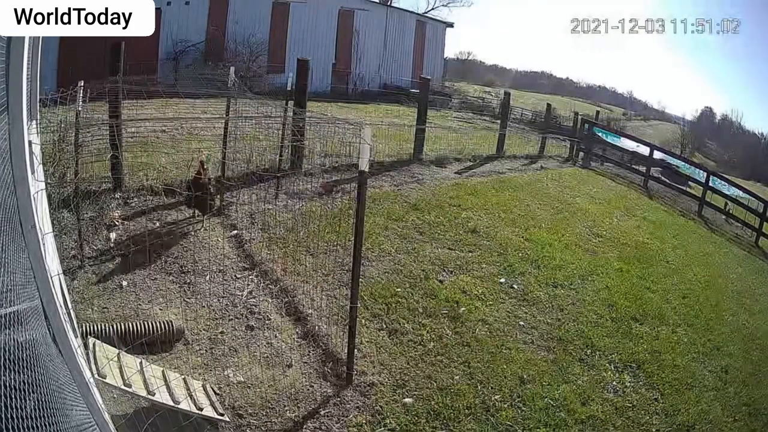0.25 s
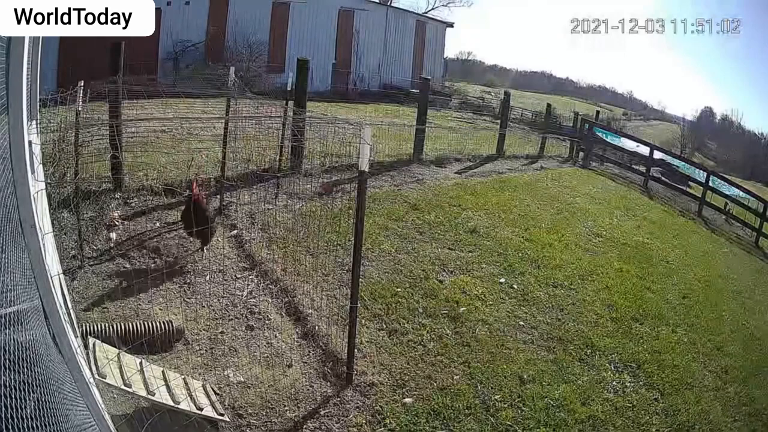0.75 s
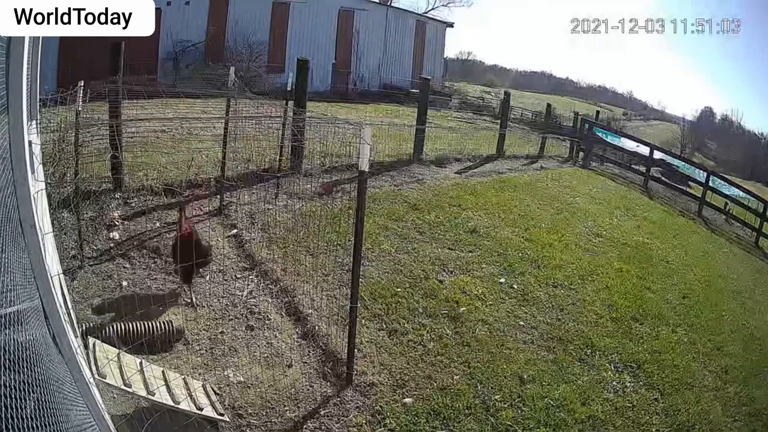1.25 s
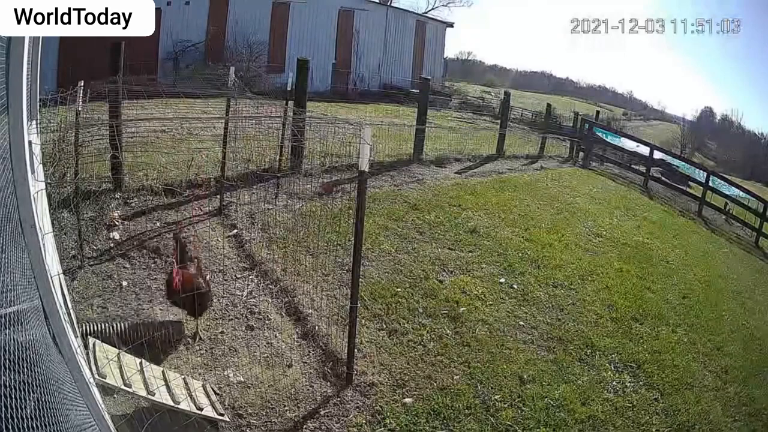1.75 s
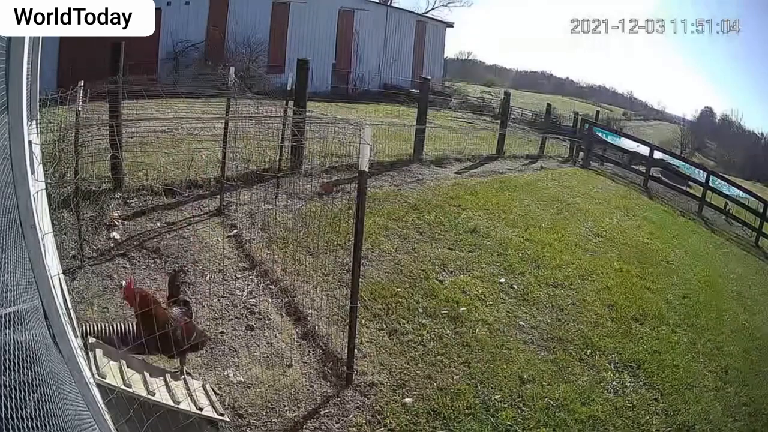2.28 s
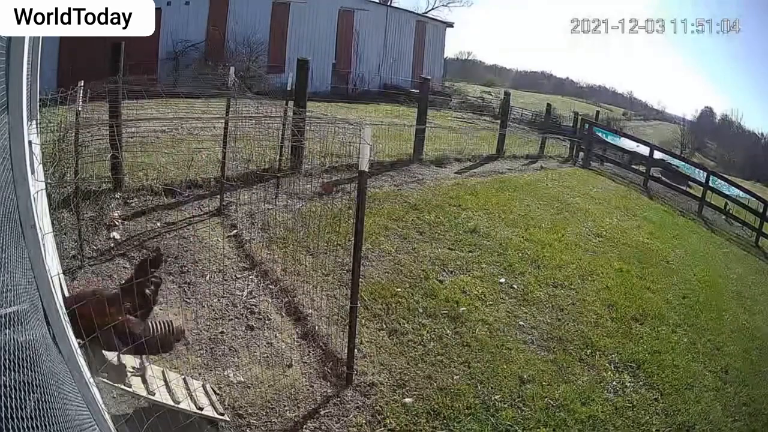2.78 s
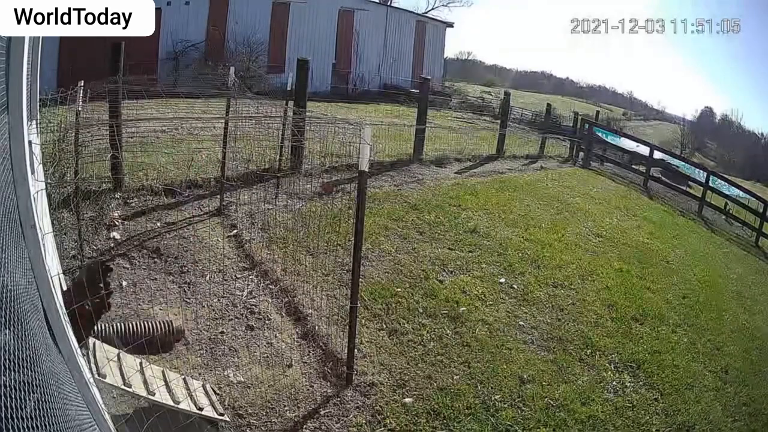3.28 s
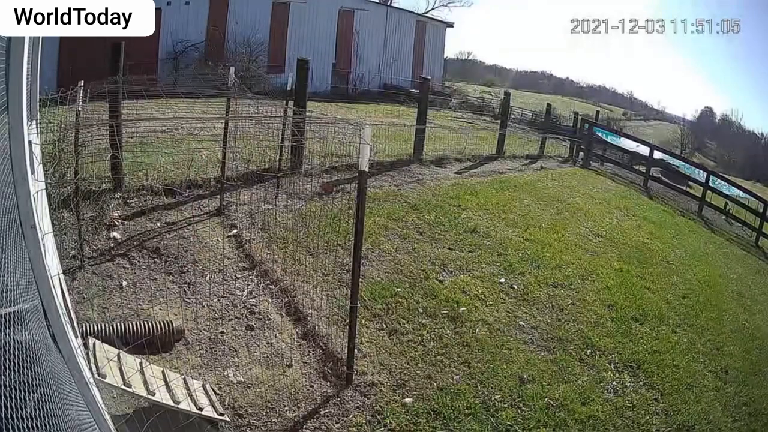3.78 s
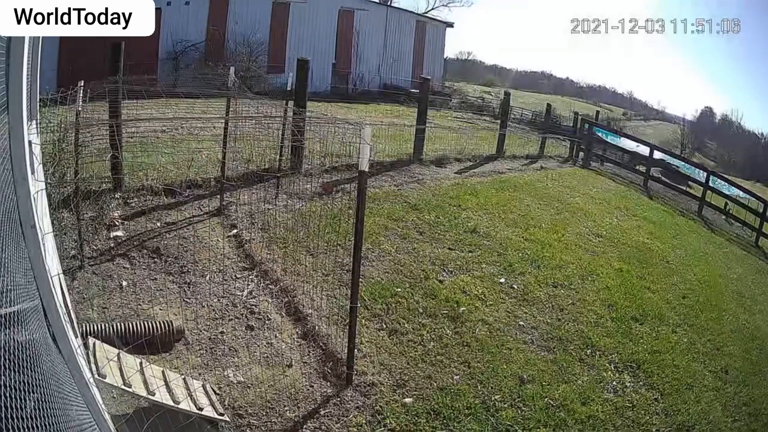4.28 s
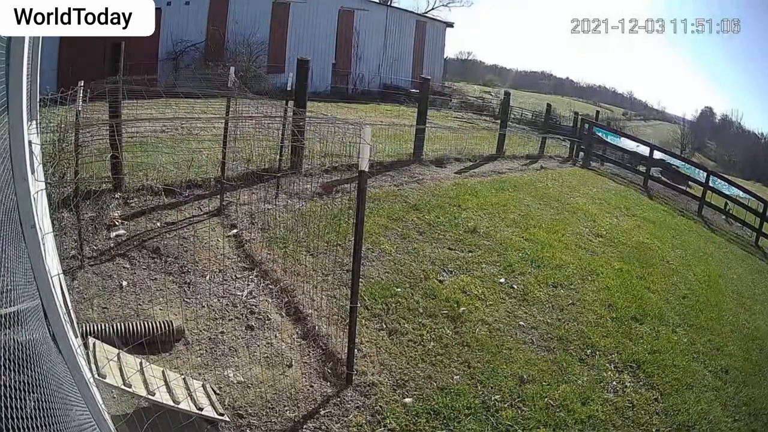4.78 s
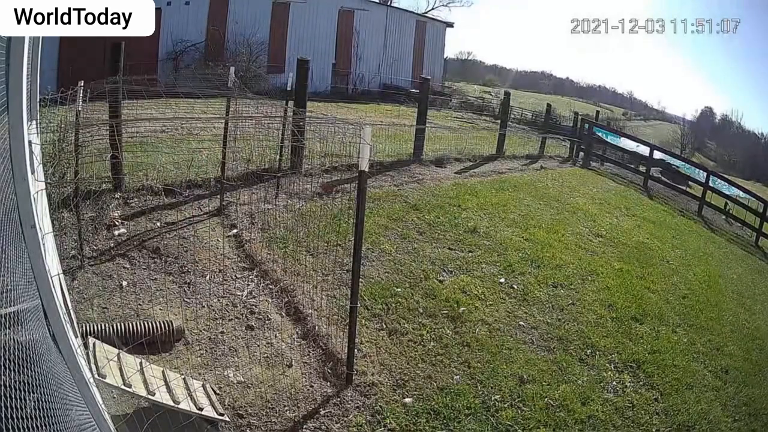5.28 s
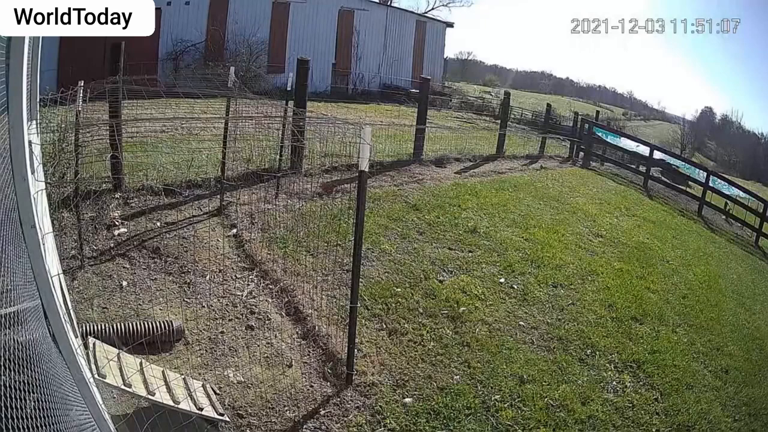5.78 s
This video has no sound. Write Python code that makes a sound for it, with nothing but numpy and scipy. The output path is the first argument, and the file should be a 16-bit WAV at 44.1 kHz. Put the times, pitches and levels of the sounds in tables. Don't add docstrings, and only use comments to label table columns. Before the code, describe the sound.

Hoarse, sharp chicken cackles in an open yard with faint echoes, a few claw ticks and soft wooden thumps, distant machinery humming quietly underneath.

```python
import sys
import numpy as np
from scipy import signal
from scipy.fft import rfft, irfft, next_fast_len
from scipy.io import wavfile
from scipy.ndimage import uniform_filter1d, minimum_filter1d, map_coordinates

SR = 44100
rng = np.random.default_rng(int(sys.argv[2]) if len(sys.argv) > 2 else 0)


def decibels_to_gain(level_db):
    exponent = np.asarray(level_db, float) / 20
    return 10 ** exponent


def file_out(sig):
    cols = np.atleast_2d(sig).T
    lim = np.clip(cols, -1, 1)
    pcm = np.round(lim * 32767).astype(np.int16)
    wavfile.write(sys.argv[1], SR, pcm)


N = 266795
T = np.arange(N) / SR


def unit(x):
    return x / np.sqrt(np.mean(x ** 2) + 1e-20)


def along(points, hz):
    f, v = np.transpose(points)
    return np.interp(np.log(hz + 1), np.log(f + 1), v)


def filtered(x, response):
    m = next_fast_len(len(x) + 8192)
    return irfft(rfft(x, m) * response(np.fft.rfftfreq(m, 1 / SR)), m)[:len(x)]


def coloured(x, spectrum):
    points = [(0.84, -120)] + list(spectrum) + [(9000, -120)]
    return unit(filtered(x, lambda hz: decibels_to_gain(along(points, hz))))


def wobble(n, rate):
    knots = rng.standard_normal(int(n * rate / SR) + 4)
    return map_coordinates(knots, [np.arange(n) * rate / SR])


def scattered(x, t60):
    t = np.arange(SR // 16) / SR
    reply = rng.standard_normal(len(t)) * decibels_to_gain(-60 * t / t60)
    return signal.fftconvolve(x, reply)[:len(x)]


def syrinx(pitch_hz, jitter, shimmer_db, breath):
    n = len(pitch_hz)
    phase = 2 * np.pi * np.cumsum(pitch_hz * (1 + jitter * wobble(n, 160))) / SR
    k = np.arange(1, 24)[:, None]
    pulses = unit(np.cos(k * phase).sum(axis=0)) * decibels_to_gain(shimmer_db * wobble(n, 219.6))
    air = unit((1 + 1.4 * np.cos(phase)) * rng.standard_normal(n))
    return np.sqrt(1 - breath) * unit(pulses) + np.sqrt(breath) * air


# t/s, hold/s, low voice level/dB, its second harmonic f/Hz, high voice over it level/dB
CLUCK_EVENTS = [(0.327, .022, -16, 735, -14), (0.559, .032, -16.5, 780, -4.5),
                (0.803, .021, -15, 717, -12.5), (1.415, .026, -18, 843.5, 3), (1.63, .032, -15, 699.7, -4),
                (1.884, .024, -16, 778, -4.5), (2.216, .04, -37, 790, -21), (2.483, .034, -20.5, 830, 1.5),
                (2.695, .032, -10.5, 785, -10.5), (2.842, .015, -14, 800, -2.5),
                (2.98, .008, -19, 650, -13), (3.768, .043, -18.5, 740, -5.5), (4.561, .038, -26, 770, 2.5),
                (4.78, .044, -22, 752.8, -2.5), (5.063, .034, -19, 760, -4),
                (5.764, .034, -22.5, 745, -6.5), (6.017, 0.013, -18.5, 740, -12)]
# second harmonic of the high voice f/Hz, its fundamental over it level/dB, beak over low voice
# level/dB, beak opening f/Hz, low voice swell over the hold level/dB
CLUCK_GAPE = [(946, -8, -5, 2733, 5), (1070, -9, .6, 2510, -7), (1082, -17, -4, 2300, 5),
              (1035, -19, -.4, 2130, 4), (1092, 1.5, -1.5, 2004, -5), (965, -1, 3.5, 2300, -4),
              (1110, -3, -21, 2200, -5), (1050, -25, -4.5, 2000, -2.5), (940, -12, -8, 2073, -4),
              (1162, -3, -4.5, 1700, -1.5), (1050, 1.5, -12, 2566, 1.5), (1030, -12, -8.5, 2383, 5),
              (1002, -9.5, .6, 2100, -5), (1077, -3.5, -2.5, 2420, -4), (1078, -6.5, -8.5, 1850, -4),
              (895, -6, -9, 2350, 2.5), (950, -5, -9, 2300, -1.5)]
# f/Hz, level/dB
CHEST_SPECTRUM = [(120, -41), (250, -22.5), (400, -18), (700, 5), (850, 3.5), (1150, -17), (1400, -28),
                  (1600, -47)]
# f/Hz, level/dB
HEAD_SPECTRUM = [(700, -32.5), (900, -0.5), (1080, -12.5), (1300, -8), (1500, -31), (1700, -42.5)]
# f/Hz, level/dB
ROOT_SPECTRUM = [(380, -36.5), (480, -10.5), (600, 5), (720, -40.5)]
# f/Hz, level/dB
BEAK_SPECTRUM = [(1100, -36), (1400, -6), (2500, -3), (4000, -11.5), (4600, -35.5)]
# f/Hz, level per Hz/dB
RASP_SPECTRUM = [(2350, -43), (4000, -16), (4170, -5.5), (4530, -1), (6720, 3), (7220, -4), (7550, -30),
                 (8160, -43.5), (10600, -80), (18000, -120)]
LOW_SHAPE, HIGH_SHAPE = (-11.5, 0.04, -1.5, -36), (-18.5, -.4, 0.66, -46)
BEAK_SHAPE, RASP_SHAPE = (-30, .4, .4, -56), (-40, 1.5, .4, -66)
LOW_SAG, HIGH_SAG = (.05, .16), (.05, .14)
ATTACK_S, RELEASE_S = .021, .055
FLIP_RISE, FLIP_PER_DB = .015, .006
TRADE = 1.2
ARCH_DB = 4
THROAT_HZ = (1892, 3403)
SHUT = .85
RASP_OUT_DB, RASP_IN_DB, DOOR_S = -3.5, -10.5, (2.5, 3.0)


def clucks():
    out = np.zeros(N + SR)
    t = np.arange(SR // 8) / SR
    for (s, hold, db, low_hz, over_db), gape in zip(CLUCK_EVENTS, CLUCK_GAPE):
        high_hz, root_db, beak_db, open_hz, lean_db = gape
        knots = np.cumsum([0, ATTACK_S, abs(hold), RELEASE_S])

        def shape(values):
            return np.interp(t, knots, values)

        course = shape([-1, -1, 1, 1])
        lean = lean_db / 2 * course
        arch = ARCH_DB * course ** 2
        rise = 1 + FLIP_RISE - FLIP_PER_DB * lean_db

        def tense(sag):
            return shape([1 - sag[0], 1, rise, rise - sag[1]])

        low_db = db + shape(LOW_SHAPE) + lean
        high_db = db + over_db - TRADE * lean + shape(HIGH_SHAPE)
        low = syrinx(low_hz / 2 * tense(LOW_SAG), jitter=.011, shimmer_db=3.5, breath=.17)
        high = syrinx(high_hz / 2 * tense(HIGH_SAG), jitter=.014, shimmer_db=3.5, breath=.2)
        share = 1 / (1 + decibels_to_gain(2 * (low_db - high_db - 2.5)))
        both = scattered(np.sqrt(1 - share) * low + np.sqrt(share) * high, 0.037)
        tilt_db = np.clip(.3 * (db + beak_db + 19), -12, 12)

        def mouth(size):
            def response(hz):
                centres = (*THROAT_HZ, open_hz)
                peaks = sum(6 / (1 + ((hz - c * size) / 90) ** 2) for c in centres)
                return (.9 + peaks) * decibels_to_gain(tilt_db * np.log2(hz / 2400 + .01))
            return filtered(both, response)

        opened = shape([0, .7, 1, 0])
        beak = opened * mouth(1) + (1 - opened) * mouth(SHUT)
        head = coloured(high, HEAD_SPECTRUM) + decibels_to_gain(root_db) * coloured(high, ROOT_SPECTRUM)
        voice = decibels_to_gain(low_db) * coloured(low, CHEST_SPECTRUM) + decibels_to_gain(high_db) * head
        rasp_db = np.interp(s, DOOR_S, [RASP_OUT_DB, RASP_IN_DB]) + shape(RASP_SHAPE) - arch
        bright = decibels_to_gain(shape(BEAK_SHAPE)) * coloured(beak, BEAK_SPECTRUM)
        bright = bright + decibels_to_gain(rasp_db) * coloured(both, RASP_SPECTRUM)
        bright = decibels_to_gain(db + beak_db - TRADE * lean - arch) * bright
        swell = np.clip(t / .015, 0, 1) * np.clip((knots[-1] - t) / .02, 0, 1)
        out[round(s * SR):][:len(t)] += (voice + bright) * np.sin(np.pi / 2 * swell) ** 2
    return out[:N]


# t/s, level/dB, half pitch f/Hz
SQUAWK_COURSE = [
    (2.86, -17, 302),
    (2.885, -12.5, 310.5),
    (2.97, -9, 311),
    (2.999, -16, 312),
]
# multiple, level/dB
SQUAWK_OVERTONES = [(1, -32), (2, -2.5), (3, -15), (4, -6), (5, -17.5), (6, -14.5), (7, -19.5), (8, -20),
                    (9, -20.5), (10, -14.5), (11, -28.5), (12, -19.5), (13, -38), (14, -26), (15, -22.5),
                    (16, -28.5), (17, -22), (18, -29), (19, -33), (20, -36), (21, -36), (22, -29.5),
                    (23, -34)]


def squawk():
    s, level_db, half_hz = np.transpose(SQUAWK_COURSE)
    phase = 2 * np.pi * np.cumsum(np.interp(T, s, half_hz) * (1 + 0.0045 * wobble(N, 90))) / SR
    on = (T > s[0]) & (T < s[-1])
    n = on.sum()
    tone = np.zeros(n)
    for k, db in SQUAWK_OVERTONES:
        tone += decibels_to_gain(db + 3.9 * wobble(n, 36)) * np.sin(k * phase[on] + rng.uniform(0, 2 * np.pi))
    air = coloured(rng.standard_normal(n), [(400, -39), (650, 14.5), (3000, -1.5), (6500, -7.0), (7600, -52)])
    cry = (unit(tone) + decibels_to_gain(-11) * air) * decibels_to_gain(np.interp(T[on], s, level_db))
    out = np.zeros(N)
    out[on] = cry * signal.windows.tukey(n, .25)
    return out


# t/s, length/s, level/dB, strongest overtone at the start f/Hz, at the end f/Hz
MOAN_EVENTS = [
    (1.5, .12, -50, 1910, 1830),
    (1.722, 0.17, -48.5, 1980, 1990),
    (1.972, 0.09, -40.5, 2190, 2100),
    (2.046, 0.33, -51, 2180, 2300),
    (4.662, 0.096, -54, 2080, 1900),
]
# t/s, f/Hz, level/dB
COO_COURSE = [
    (2.22, 384, -64),
    (2.268, 400, -39.5),
    (2.31, 356, -76),
]
MOAN_FADE_DB = 9


def moan():
    out = np.zeros(N)
    for s, length, level_db, from_hz, to_hz in MOAN_EVENTS:
        u = np.minimum(np.arange(SR // 3) / SR / length, 1)
        n = len(u)
        glide_hz = from_hz + (to_hz - from_hz) * u
        phase = 2 * np.pi * np.cumsum(glide_hz * (1 + .03 * wobble(n, 150))) / SR
        tone = np.zeros(n)
        for k, db in [(5, -14), (6, 0), (7, -10)]:  # harmonic, dB
            tone += decibels_to_gain(db + 5 * wobble(n, 60)) * np.sin(phase * k / 6)
        edges = np.clip(10 * np.minimum(u, 1 - u), 0, 1)
        out[round(s * SR):][:n] += unit(tone) * decibels_to_gain(level_db + 2.5 - MOAN_FADE_DB * u) * edges
    s, pitch_hz, level_db = np.transpose(COO_COURSE)
    t = np.arange(s[0], s[-1], 1 / SR)
    coo = np.sin(2 * np.pi * np.cumsum(np.interp(t, s, pitch_hz)) / SR)
    coo = coo * decibels_to_gain(np.interp(t, s, level_db) + 4)
    out[round(s[0] * SR):][:len(t)] += coo * signal.windows.tukey(len(t), .3)
    return out


# t/s, peak level/dB, ring f/Hz, upper overtone level/dB, upper overtone f/Hz
PEEPS = [
    (0.096, -48, 1047, -27.5, 2010),
    (1.116, -44, 1047, -30, 2150),
    (1.288, -50.5, 1036, -27, 2950),
    (2.118, -33, 1070, -4, 2165),
    (3.569, -52, 1050, -24.5, 2425),
    (4.006, -44, 760, -33, 2464),
    (4.189, -51, 590, -20, 3090),
    (4.429, -53.5, 1200, -21, 2050),
    (5.289, -49, 828, -26.5, 2056),
    (5.535, -41.5, 1075, -23.5, 4440),
]


def far_hens():
    out, t = np.zeros(N + SR), np.arange(SR // 20) / SR
    for s, db, hz, upper_db, upper_hz in PEEPS:
        phase = 2 * np.pi * np.cumsum(1 + .012 * wobble(len(t), 120)) / SR
        peep = np.sin(hz * phase) + decibels_to_gain(-22) * np.sin(hz * phase / 2)
        peep = peep + decibels_to_gain(upper_db) * np.sin(upper_hz * phase)
        peep = unit(scattered(peep * decibels_to_gain(6.8 * wobble(len(t), 227)), .02))
        out[round((s - .018) * SR):][:len(t)] += decibels_to_gain(db - 8) * peep * np.hanning(len(t))
    return out[:N]


# t/s, peak level/dB, t60/s
CLAW_STEPS = [
    (2.3361, -22.5, 0.052),
    (2.367, -28, 0.04),
    (2.4027, -62, 0.091),
    (2.4362, -45, 0.032),
    (3.2809, -46.5, 0.12),
    (3.3044, -54, 0.058),
]
# f/Hz, level per Hz/dB
RAMP_SPECTRUM = [(350, -44), (600, -10), (1340, -17.5), (2280, 3.5), (2510, -7), (2860, 3.5), (6800, -9),
                 (8000, -18.5), (10400, -67), (17600, -120)]


def claws():
    out, t = np.zeros(N + SR), np.arange(SR // 12) / SR
    for s, db, t60 in CLAW_STEPS:
        grains = rng.standard_normal(len(t)) * decibels_to_gain(3 * wobble(len(t), 600))
        decay = decibels_to_gain(db + 2 - 60 * t / np.clip(t60, .02, .12))
        onset = (1 - np.exp(-t / (0.034 * t60))) ** 2
        out[round(s * SR):][:len(t)] += decay * onset * coloured(grains, RAMP_SPECTRUM)
    return out[:N]


# t/s, peak level/dB, ring f/Hz, knock level/dB
FOOTFALLS = [
    (1.758, -39, 26.6, -19),
    (2.371, -33, 47.2, -19),
    (2.532, -32, 64.6, -7.5),
    (2.738, -27, 32.9, -6.5),
    (3.108, -43.5, 81.5, -19),
    (3.287, -40.5, 26.1, -2.5),
    (3.356, -44, 60.4, -11),
    (4.957, -41.5, 56, -12),
]


def thumps():
    out, t = np.zeros(N + SR), np.arange(SR // 8) / SR
    for s, db, hz, knock_db in FOOTFALLS:
        knock = coloured(rng.standard_normal(len(t)), [(80, -23.5), (160, -5), (350, 4), (600, -24.0)])
        ring = np.sin(2 * np.pi * hz * t) * decibels_to_gain(-60 * t / .16)
        push = ring + decibels_to_gain(knock_db - 60 * t / .09) * knock
        out[round(s * SR):][:len(t)] += decibels_to_gain(db + 8) * (1 - np.exp(-t / 0.0096)) * push
    return out[:N]


# delay t/s, level/dB
WALL_ECHOES = [
    (.085, -24.5),
    (0.129, -49),
    (0.182, -39),
    (0.223, -42.5),
    (.29, -43),
    (0.448, -55),
]
# f/Hz, t60/s
YARD_DECAY = [(300, .6), (800, .5), (1250, .8), (3000, .8), (7000, .65)]


def yard(x):
    hz, t, z = signal.stft(rng.standard_normal(SR), SR, nperseg=256)
    decay = decibels_to_gain(-60 * t / along(YARD_DECAY, hz)[:, None])
    tail = signal.istft(z * decay, SR, nperseg=256)[1][:SR]
    t = np.arange(SR) / SR
    reply = decibels_to_gain(-31.5) * np.roll(tail / np.linalg.norm(tail), round(WALL_ECHOES[0][0] * SR))
    for delay, db in WALL_ECHOES:
        burst = rng.standard_normal(SR) * np.exp(-np.abs(t - delay) / 0.015)
        reply = reply + decibels_to_gain(db) * burst / np.linalg.norm(burst)
    absorption = [(300, -20), (620, -4), (850, 0.0), (1250, -1.0), (1600, -4), (2400, -3.0),
                  (4000, -6), (7000, -9.5)]
    reply = filtered(reply, lambda hz: decibels_to_gain(along(absorption, hz)))
    return signal.fftconvolve(x, reply)[:N]


# t/s, level/dB
MACHINE_LOAD = [(0.0, -57), (0.3, -56.5), (0.62, -52), (0.89, -51.5), (1.3, -58.5), (1.75, -55.5),
                (2.12, -56.5), (2.42, -52.5), (2.73, -47.5), (3.03, -54), (3.39, -50), (3.72, -54),
                (4.48, -55.5), (4.99, -51), (5.68, -60), (6.05, -51.5)]
# f/Hz, pitch wander (0-1), level wander/dB
MACHINE_DRONES = [
    (64.6, 0.01, 4),
    (123.4, 0.1, -4.5),
]
# t/s, half length/s, level/dB
OCTAVE_BLOOMS = [
    (3.72, .3, -64),
    (5.1, .22, -53),
    (5.93, .17, -51.5),
]
# f/Hz, level per Hz/dB
AIR_SPECTRUM = [(47, -41), (80, -11.5), (97, -16), (134, -10), (172, -22), (294, -11), (466, -26),
                (576, -21), (966, -28.5), (1060, -29.5), (1620, -32), (2720, -33), (7800, -44.5),
                (10100, -81), (17200, -120)]
OCTAVE_DB, OCTAVE_GROWS = -70, 2.2
RUMBLE_DB, NEAR_S, NEAR_FOR_S, NEAR_DB = -62, 2.8, .8, 11


def hum():
    hum_db = np.interp(T, *np.transpose(MACHINE_LOAD))
    near_db = NEAR_DB * np.exp(-((T - NEAR_S) / NEAR_FOR_S) ** 2)
    thud_db = RUMBLE_DB + near_db + .8 * (hum_db - hum_db.mean())
    octave = decibels_to_gain(OCTAVE_DB + OCTAVE_GROWS * (hum_db + 53.5))
    for s, half, db in OCTAVE_BLOOMS:
        octave = octave + decibels_to_gain(db) * np.exp(-((T - s) / half) ** 2)

    def drone(hz, wander, db):
        cycles = hz * np.cumsum(1 + wander * wobble(N, 13)) / SR
        return unit(decibels_to_gain(db * wobble(N, 36)) * np.sin(2 * np.pi * cycles))

    thud_spectrum = [(15, 0.5), (35, 0), (50, -8.0), (90, -12.5), (200, -23.0), (400, -45.5)]  # Hz, dB
    thud = coloured(rng.standard_normal(N), thud_spectrum) * decibels_to_gain(0.83 * wobble(N, 19))
    air = coloured(rng.standard_normal(N), AIR_SPECTRUM) * decibels_to_gain(1.3 * wobble(N, 11))
    drones = decibels_to_gain(hum_db) * drone(*MACHINE_DRONES[0]) + octave * drone(*MACHINE_DRONES[1])
    return decibels_to_gain(thud_db) * unit(thud) + drones + decibels_to_gain(-63.5) * unit(air)


def scene():
    short, held = clucks(), squawk()
    away = filtered(held, lambda hz: 1 / (1 + (800 / (hz + 1)) ** 4))
    birds = short + held + yard(short + decibels_to_gain(8) * away) + moan() + far_hens()
    return (birds + claws() + thumps() + hum())[None]


def masked(x, size, bins, frames, floor, quiet_db, cap_db):
    overlap = size * 3 // 4
    hz, t, z = signal.stft(x, SR, nperseg=size, noverlap=overlap)
    level = uniform_filter1d(np.abs(z) ** 2, size=bins, axis=0)
    level = uniform_filter1d(level, size=3, axis=1)
    peak = level[hz > 300].max(axis=0)
    loudest = -minimum_filter1d(-peak, size=frames, origin=-(frames // 6))
    loudest = np.clip(loudest, decibels_to_gain(2 * quiet_db), decibels_to_gain(2 * cap_db))
    kept = level > loudest * decibels_to_gain(2 * along(floor, hz))[:, None]
    gain = uniform_filter1d(kept * 1., size=3, axis=1)
    return signal.istft(z * gain, SR, nperseg=size, noverlap=overlap)[1][:N]


def low_pass(x):
    return signal.sosfilt(signal.butter(12, 8310, fs=SR, output="sos"), x)


def record(dry):
    x = dry[0]
    shaved = x - x / (1 + np.abs(x / .75) ** 4) ** .25
    x = x - filtered(shaved, lambda hz: hz > 300)
    x = masked(x, size=2048, bins=3, frames=1, quiet_db=-61, cap_db=-50,
               floor=[(300, -50), (1200, -38), (2000, -33), (4000, -35), (7000, -38)])
    x = x + decibels_to_gain(-78.5) * rng.standard_normal(N)
    x = filtered(x, lambda hz: 1 / (1 + (hz / 7300) ** 40))
    x = masked(x, size=512, bins=5, frames=21, quiet_db=-65, cap_db=0,
               floor=[(200, -88.5), (400, -46.5), (7000, -59)])
    return low_pass(x[None])


dry = scene()
out = record(dry)
file_out(out)
```